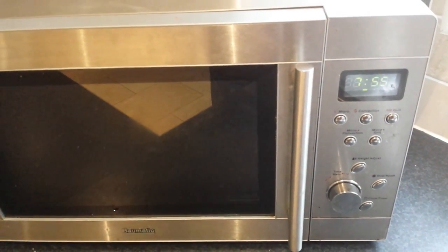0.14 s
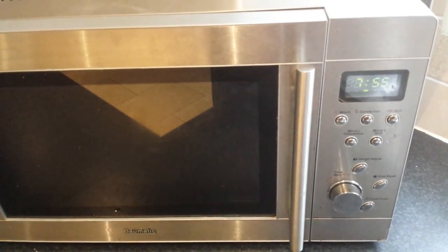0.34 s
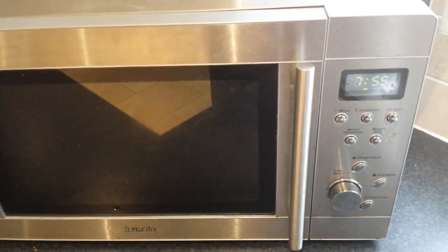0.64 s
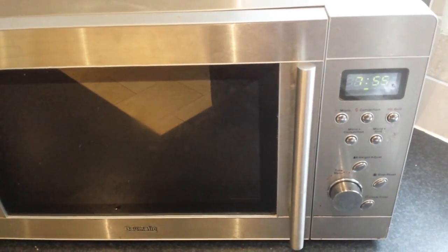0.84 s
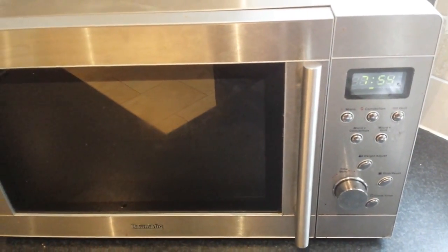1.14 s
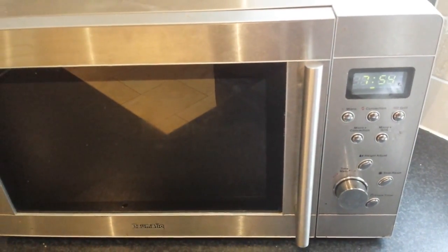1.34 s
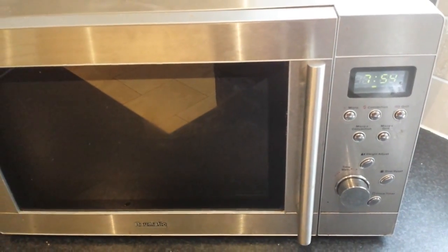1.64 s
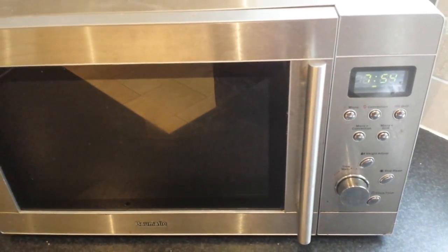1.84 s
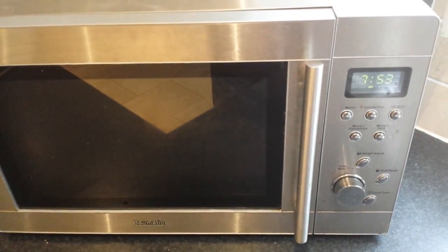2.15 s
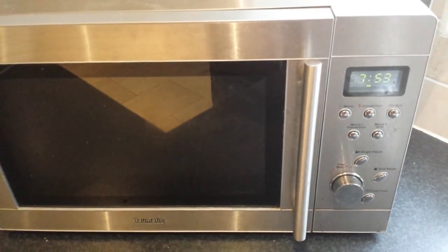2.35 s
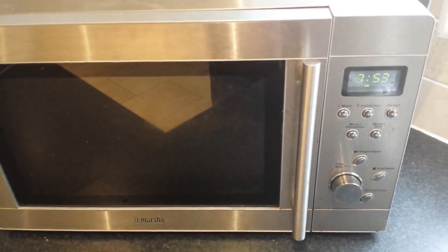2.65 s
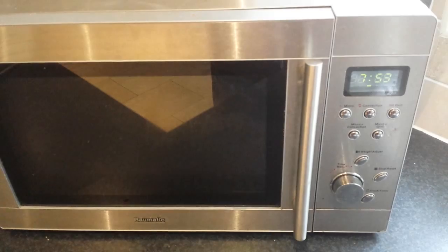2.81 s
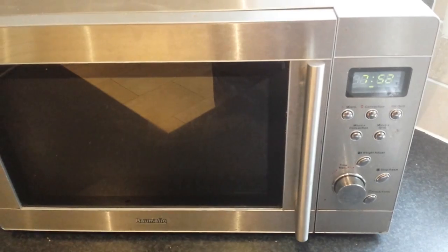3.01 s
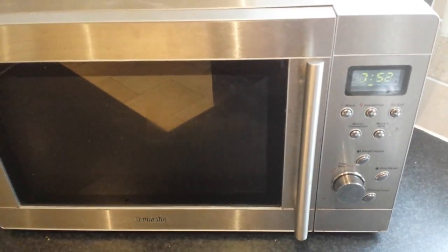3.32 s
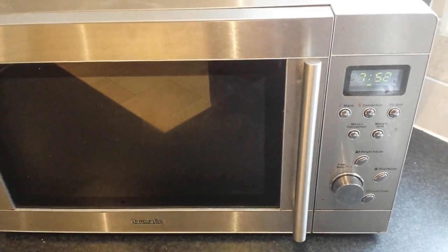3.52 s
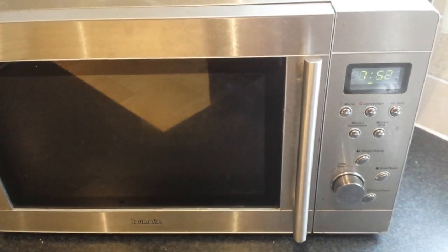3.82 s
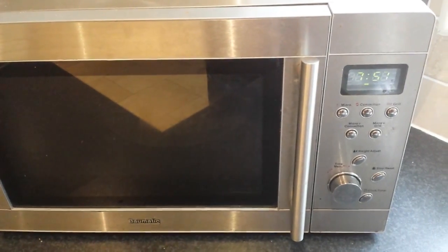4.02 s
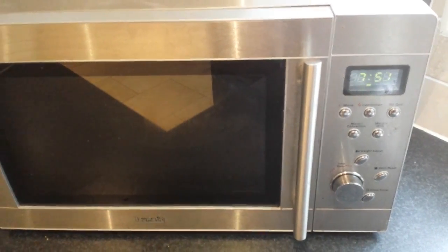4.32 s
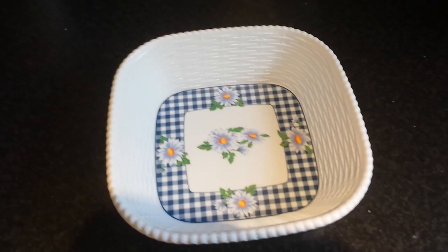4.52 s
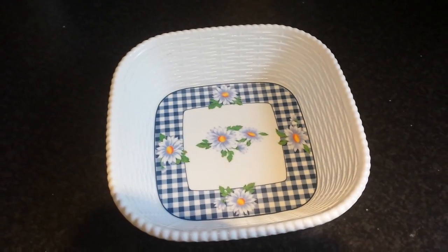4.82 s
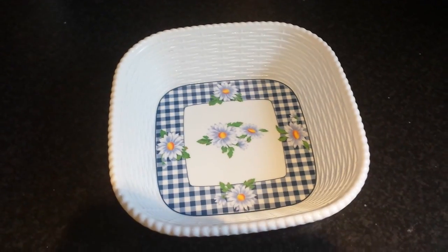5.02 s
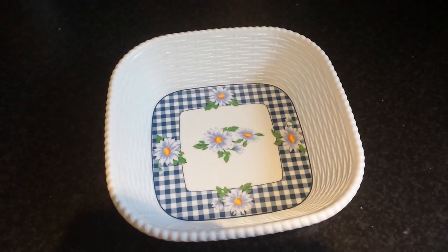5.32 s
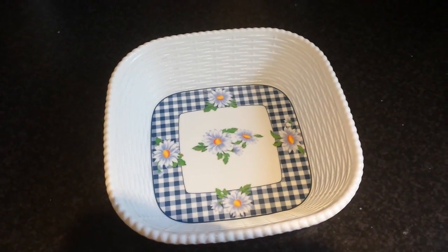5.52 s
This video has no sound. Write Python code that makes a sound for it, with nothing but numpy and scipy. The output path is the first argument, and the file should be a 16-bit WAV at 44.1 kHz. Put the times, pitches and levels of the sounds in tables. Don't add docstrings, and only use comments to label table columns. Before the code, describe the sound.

Steady microwave drone throughout, its hum swaying slightly as the hand-held stereo microphone moves, with soft puffs in the fan hiss. After about four and a half seconds a tiny plastic click at the left is followed at once by an abrupt cut to a fuller, duller version of the same drone. A light clink rings briefly in the kitchen before the end.

```python
import sys
import numpy as np
from scipy import signal
from scipy.fft import rfft, irfft, next_fast_len
from scipy.io import wavfile
from scipy.ndimage import map_coordinates

SR = 44100
rng = np.random.default_rng(int(sys.argv[2]) if len(sys.argv) > 2 else 0)


def voltage_ratio(level):
    return 10 ** (np.asarray(level, float) / 20)


def dump(signal):
    limited = np.clip(np.atleast_2d(signal).T, -1, 1)
    pcm = np.round(limited * 32767).astype(np.int16)
    wavfile.write(sys.argv[1], SR, pcm)


N = 249585

CUT_S, CUT_FADE_S = 4.491, 0.0018


def read(points, hz):
    f, value = np.transpose(points)
    return np.interp(np.log(hz + 1), np.log(f + 1), value)


def wander(hz):
    count = next_fast_len(N // 64 + 2)
    smoothing = np.exp(-(np.fft.rfftfreq(count, 64 / SR) / hz) ** 2)
    x = irfft(rfft(rng.standard_normal(count)) * smoothing, count)
    return np.interp(np.arange(N) / 64, np.arange(count), x / x.std())


def bumps_db(rows):
    t = np.arange(N) / SR
    return sum(db * np.exp(-((t - s) / half) ** 2) for s, db, half in rows)


# (time [s], level [dB])
HAND_SWAY = [(0, 0.5), (.3, 0), (.53, -.9), (.95, 0), (1.14, -1.5), (1.27, -1), (1.41, -4), (1.5, -0.5),
             (1.75, 1.2), (2.35, -0.3), (2.68, 0.85), (4.48, -0.1), (4.5, -.3), (4.66, 1), (4.78, -1.5),
             (5.08, -0.5), (5.3, 1.5), (5.66, 0.5)]


def main_hum_sway_db():
    return np.interp(np.arange(N) / SR, *np.transpose(HAND_SWAY))


# (time [s], level [dB], half length [s])
OCTAVE_DROPOUT = (4.2, -3, 0.12)


def octave_sway_db():
    start_db, sag_db_per_s = 1.0, 0.45
    t = np.arange(N) / SR
    sag = np.where(t < CUT_S, start_db - sag_db_per_s * t, 0)
    return sag + bumps_db([OCTAVE_DROPOUT])


# (multiple of the mains, level [dB rms], left-right [dB], left lead [rad])
DOOR_PARTIALS = [(2, -30.8, -4.2, -0.34), (3, -51.7, -0.2, 0.02), (4, -19.0, -0.4, -0.07),
                 (5, -53.2, 0.5, 0.05), (6, -44.6, -0.8, -0.01), (7, -42.8, -1.7, 0.19),
                 (8, -38.7, -2.6, 0.26), (11, -63.9, -1.6, -0.35), (13, -59.9, -0.9, -0.8),
                 (16, -48.3, -3.6, -0.21), (18, -54.6, -5.9, -0.57), (20, -47.7, -2.3, -0.01),
                 (21, -62.2, 3.3, 0.52), (22, -55.7, -1.7, 1.49), (24, -57.8, 1.7, 0.56),
                 (26, -60.1, -2.4, 1.16), (30, -61.0, 21.3, -1.59), (32, -64.0, -0.3, 1.69),
                 (34, -61.1, 0.3, 0.96), (36, -60.8, -10.3, -2.06), (40, -60, 5.3, 0.64),
                 (42, -58.4, 1.7, -0.48)]
BESIDE_PARTIALS = [(2, -25.8, -0.7, 0.0), (3, -46.6, -0.7, 0.0), (4, -22.2, -1.0, 0.14),
                   (5, -44.2, -0.7, 0.06), (7, -46, -1, 0.2), (8, -34.9, -1.3, 0.29),
                   (12, -48.0, 0.5, 0.48), (14, -49.6, -5.0, 0.87), (26, -57.7, -10.9, 1.14),
                   (30, -62.9, -14.5, 1.46), (32, -63.3, -10.3, 1.94), (34, -59.1, -6.1, 0.61)]
FAINT_PARTIALS = [
    [(12, -63, 0, 0.1), (14, -55, -1, 0.1), (28, -64, 0, 0.1), (38, -65, 0, 0.1)],
    [(18, -59, -3, 1.1), (24, -63, -4, 1.1)],
]


def hum(place, turn):
    out = np.zeros((2, N))
    sway = {4: main_hum_sway_db(), 8: octave_sway_db()}
    for k, db, pan_db, lead in (DOOR_PARTIALS, BESIDE_PARTIALS)[place] + FAINT_PARTIALS[place]:
        if k < 13:
            lag = 1.22 * np.log2(k / 4)
        else:
            lag = 5.15 - 1.17 * k + 0.36 * rng.standard_normal()
        flutter_db = (0.13 + 0.04 * k) * wander(hz=7.6)
        level_db = db + sway.get(k, 0) + 0.036 * max(k - 12, 0) + flutter_db
        mean = abs(voltage_ratio(pan_db / 2) * np.exp(1j * lead) + voltage_ratio(-pan_db / 2)) / 2
        for side, sign in enumerate((0.5, -0.5)):
            gain = voltage_ratio(level_db + sign * pan_db) / max(mean, 0.6)
            out[side] += np.sqrt(2) * gain * np.cos(k * turn + lag + sign * lead)
    return out


# (frequency [Hz], level of a line [dB rms])
PLATE_BUZZ = [(2000, -69.5), (2700, -72.5), (3300, -74), (3800, -72.5), (4500, -73), (5300, -74),
              (6000, -84.5), (6700, -76.5), (7500, -80.5), (8500, -90), (10000, -84), (11500, -103)]
# (door [dB], beside [dB])
BUZZ_PLACE_DB = (-1.1, -5.5)
# (frequency [Hz], left-right [dB])
STEREO_TILT = [
    [(60, -1.5), (110, -5), (200, -1), (380, -1), (700, 0.5), (1280, 0.5), (2370, 2), (4370, -1.5), (8050, -5.5), (14900, -6)],
    [(60, -2), (110, -2), (200, -1.0), (380, -0.5), (700, -2), (1280, -3.5), (2370, -10.5), (4370, -5), (8050, -8), (14900, -3.5)],
]


def buzz(place, turn):
    k = np.arange(43, 240)
    hz = 50 * k
    level, spread = rng.standard_normal((2, 2, len(k)))
    odd_db = k % 2 * np.clip(0.34 * (k - 80), -9, 1.5)
    phase = 1.1 * spread - 2.6 * k + k % 2 * np.pi / 2
    level_db = read(PLATE_BUZZ, hz) + BUZZ_PLACE_DB[place] + 3.1 * level + odd_db
    lines = np.zeros((2, 513), complex)
    lines[:, k] = voltage_ratio(level_db) * np.exp(1j * phase)
    lines[:, k] *= voltage_ratio(np.outer([0.5, -0.5], read(STEREO_TILT[place], hz)))
    cycle = irfft(lines) * 1024
    at = turn / (2 * np.pi) % 1 * 1024
    rattle = [map_coordinates(c, [at], order=3, mode="grid-wrap") for c in cycle]
    return np.array(rattle) * voltage_ratio(1.4 * wander(hz=8))


def room_ripple(hz, width_hz):
    knots = rng.standard_normal((3, 2000))
    both, *each = (np.interp(hz / width_hz, np.arange(2000), k) for k in knots)
    alike = np.clip(700 / (hz + 1), 0, 1)
    ripple = alike * both + np.sqrt(1 - alike ** 2) * np.array(each)
    return ripple * np.clip(hz / 400 - 0.5, 0, 1) / (1 + hz / 5000)


# (time [s], level [dB], half length [s])
PUFFS = [
    (0.0, 1.5, .07),
    (.3, 1.2, 0.074),
    (1.41, 1.2, .07),
    (2.35, 2.9, 0.055),
    (2.95, 3, .12),
    (4.64, 2, .17),
    (5.2, 1.7, .2),
]


def hiss_drift_db():
    return -1.5 + bumps_db(PUFFS)


# (frequency [Hz], level [dB per Hz])
AIR_RUMBLE = [(20, -81.5), (75, -74), (95, -65.5), (115, -65.5), (200, -63), (280, -68), (370, -65.5)]
# (frequency [Hz], level [dB per Hz])
FAN_AIR = [
    [(415, -72), (600, -71.5), (1000, -75), (1500, -76.5), (2100, -76), (2700, -82.5), (4000, -85), (5500, -87), (7500, -91), (9000, -96), (11500, -102), (13500, -104), (15500, -104)],
    [(415, -67), (620, -67.5), (800, -74), (1000, -75), (1500, -76), (2300, -78), (4200, -83), (5500, -87.5), (7500, -92), (9000, -97.5), (11500, -102), (13500, -105), (15500, -106)],
]
# (frequency [Hz], width [Hz], level at door [dB per Hz], level beside [dB per Hz])
DUCT_RINGS = [(145, 14, -65.5, -58), (176, 14, -61, -58), (200.4, 12, -59, -58), (246, 12, -63.5, -59.5),
              (296, 22, -60, -60), (348.5, 17.4, -58, -54), (518.3, 28.5, -63.5, -60.5),
              (681, 34, -67, -59), (854, 34, -64.5, -67.5), (1027, 48, -67, -68.5), (1222, 31, -71, -77),
              (1318, 43, -65.5, -73.5), (1676, 47, -67, -74), (1880, 62, -75.5, -74),
              (2430, 34, -78.5, -85)]
# (frequency [Hz], correlation [0-1])
PORT_LIKENESS = [
    [(40, .9), (90, 0.84), (400, 0.91), (520, 0.78), (900, 0.69), (1200, 0.44), (1600, 0.2), (3000, .2), (6000, .05)],
    [(40, .9), (90, 0.93), (400, 0.93), (700, 0.94), (1000, 0.73), (1300, 0.41), (1700, 0.22), (3000, 0.18), (6000, .1)],
]
# (door [s], beside [s])
FAN_DELAY_S = (.00001, 0.00025)


def fan(place):
    hz = np.fft.rfftfreq(N, 1 / SR)
    power = voltage_ratio(read(AIR_RUMBLE + FAN_AIR[place], hz) + 3.7 * room_ripple(hz, width_hz=22)) ** 2
    for f, width, *db in DUCT_RINGS:
        power += voltage_ratio(db[place]) ** 2 / (1 + (2 * (hz - f) / width) ** 2) ** 1.5
    a, b = rfft(rng.standard_normal((2, N)))
    same = np.clip(read(PORT_LIKENESS[place], hz), 0, 1)
    late = np.exp(-2j * np.pi * hz * FAN_DELAY_S[place])
    left, right = a, same * a * late + np.sqrt(1 - same ** 2) * b
    ports = np.array([left, right]) * np.sqrt(power * SR / (1 + same))
    ports *= voltage_ratio(np.outer([0.5, -0.5], read(STEREO_TILT[place], hz)))
    high = 1 / (1 + (4500 / (hz + 1)) ** 2)
    body = irfft(ports * (1 - high), N)
    hiss = irfft(ports * high, N)
    return body + hiss * voltage_ratio(hiss_drift_db() + 0.5 * wander(hz=12))


def motor(row, place, waver_hz, waver_db):
    spin = 2 * np.pi * np.cumsum(row[0] + waver_hz * wander(hz=2.5)) / SR
    return np.sqrt(2) * voltage_ratio(row[1 + place] + waver_db * wander(hz=2.9)) * np.cos(spin)


# (frequency [Hz], level at door [dB rms], level beside [dB rms])
FAN_UNBALANCE = (49.25, -43.5, -45.5)
TURNTABLE_LINES = [(142.86, -43, -35.3), (192.84, -45.1, -51), (242.7, -62, -47)]
BLADE_LINES = [(172.0, -44.3, -44.4), (344.0, -47.5, -46), (688.0, -62, -48.5)]
# (door [Hz], beside [Hz])
MAINS_PLACE_HZ = (49.94, 49.96)
CUT_PHASE = (1.29, 3.33)


def oven(place):
    turn = 2 * np.pi * np.cumsum(MAINS_PLACE_HZ[place] + 0.01217 * wander(hz=1)) / SR
    turn = turn - turn[round(CUT_S * SR)] + CUT_PHASE[place]
    motors = motor(FAN_UNBALANCE, place, waver_hz=0.1, waver_db=1.3)
    for row in TURNTABLE_LINES + BLADE_LINES:
        motors = motors + motor(row, place, waver_hz=0.06 * row[0] / 170, waver_db=0.7)
    return hum(place, turn) + buzz(place, turn) + fan(place) + motors


# (port [0 left, 1 right], time [s], peak [dB], frequency [Hz], length [cycles])
TICK_RINGS = [
    (0, 4.41981, -7.5, 3340, 1.16),
    (0, 4.41966, -19, 5700, 1.3),
    (0, 4.4203, -30, 3020, 0.84),
    (1, 4.42005, -18, 5400, 1.6),
    (1, 4.42, -26, 3600, 1.2),
]


def tick():
    out = np.zeros((2, N))
    for port, s, db, hz, cycles in TICK_RINGS:
        t = np.arange(N) / SR - s
        envelope = np.exp(-(t * hz / cycles) ** 4)
        out[int(port > 0.5)] -= voltage_ratio(db) * envelope * np.cos(2 * np.pi * hz * t + 0.2)
    return out


# (frequency [Hz], width [Hz], level [dB rms], 60 dB decay [s])
CLINK_BANDS = [(2250, 320, -36.5, 0.35), (3150, 480, -39, .25), (4050, 610, -34.5, 0.23),
               (5200, 400, -45, .12), (6300, 400, -46, .12), (7470, 640, -40, 0.19),
               (10500, 1300, -54.5, .12)]


def clink():
    start_s, pan_db = 5.1715, -5
    t = np.maximum(np.arange(N) / SR - start_s, 0)
    hz, out = np.fft.rfftfreq(N, 1 / SR), 0
    for f, width, db, t60 in CLINK_BANDS:
        noise = rfft(rng.standard_normal((2, N)))
        band = irfft(noise * np.exp(-((hz - f) / width) ** 2), N)
        swell = 1 - np.exp(-t * (f / 4000) ** 3 / 0.0014)
        out = out + band / band.std() * voltage_ratio(db - 60 * t / t60) * swell
    onset = 1 + 1.1 * np.exp(-t / 0.0044)
    return out * onset * voltage_ratio([[pan_db / 2], [-pan_db / 2]])


def scene():
    beside = np.clip((np.arange(N) / SR - CUT_S) / CUT_FADE_S + 0.5, 0, 1)
    return (1 - beside) * oven(place=0) + beside * oven(place=1) + tick() + clink()


def low_pass(x):
    return signal.sosfilt(signal.butter(12, 15460, fs=SR, output="sos"), x)


def record(dry):
    return low_pass(dry)


dry = scene()
out = record(dry)
dump(out)
```